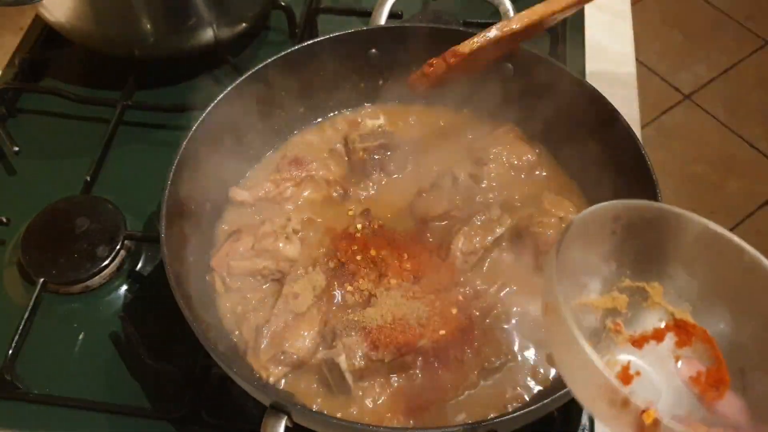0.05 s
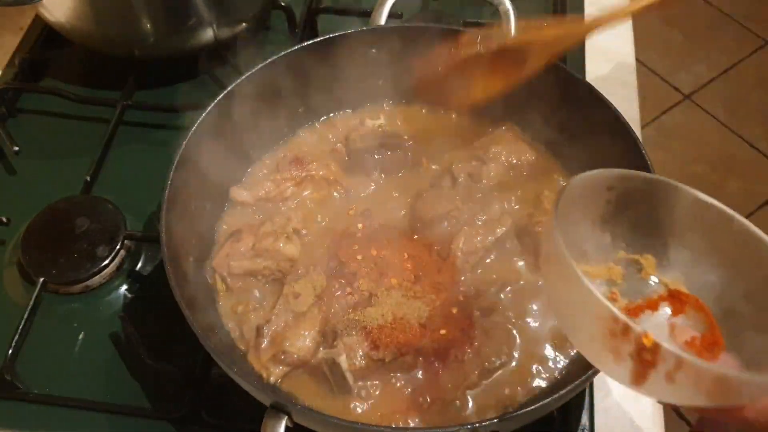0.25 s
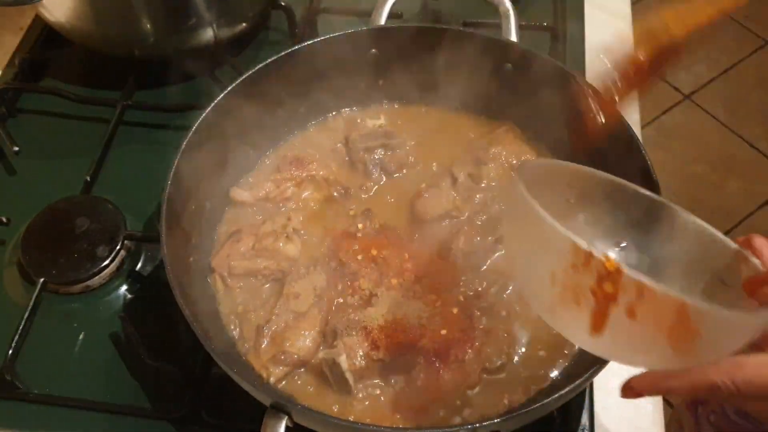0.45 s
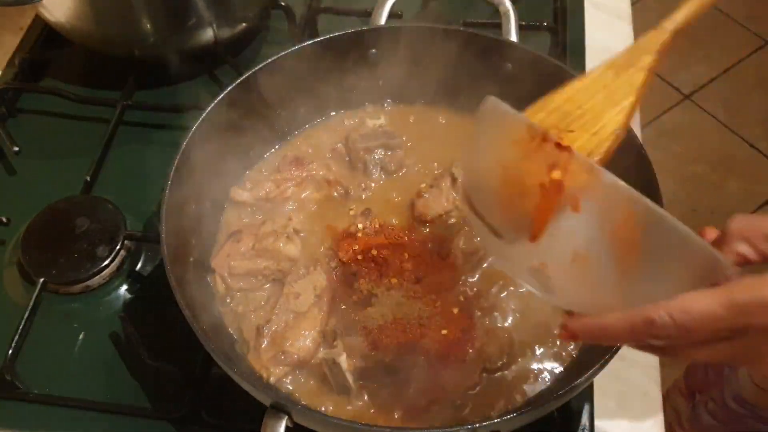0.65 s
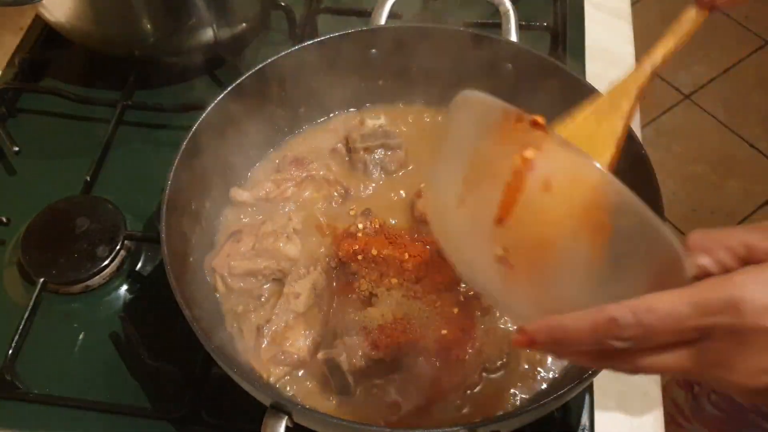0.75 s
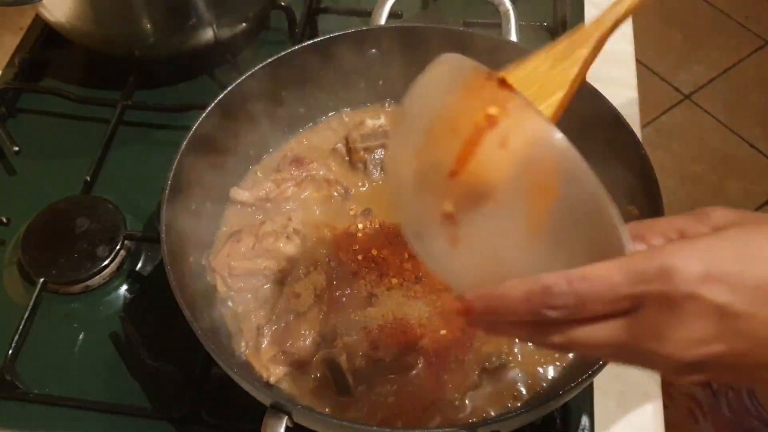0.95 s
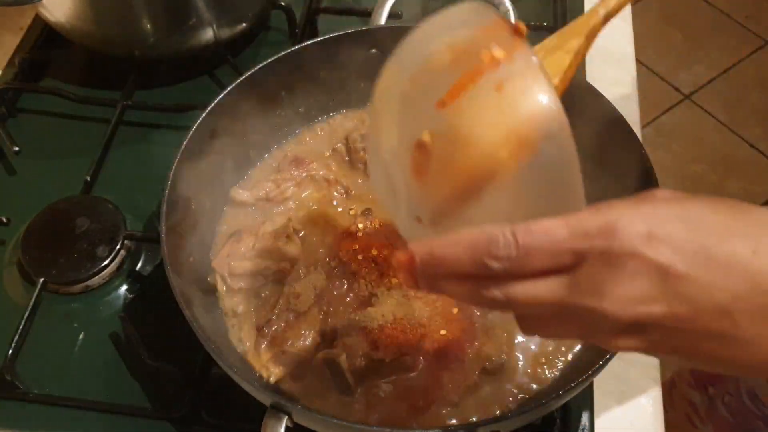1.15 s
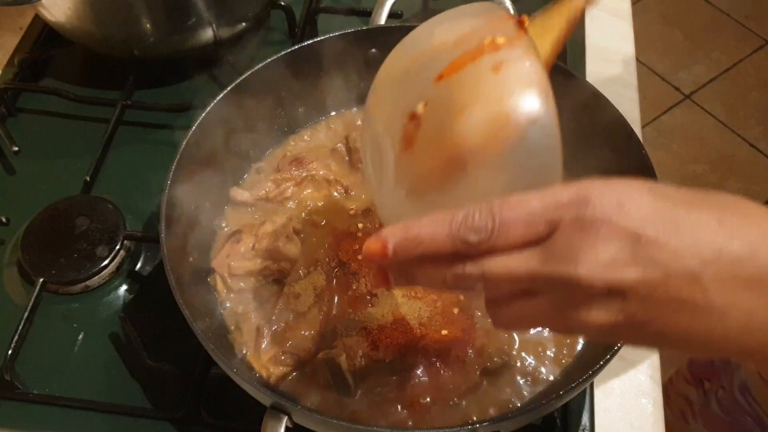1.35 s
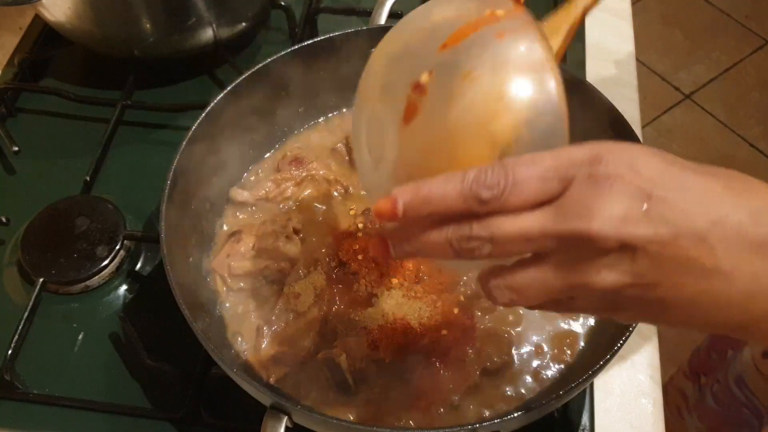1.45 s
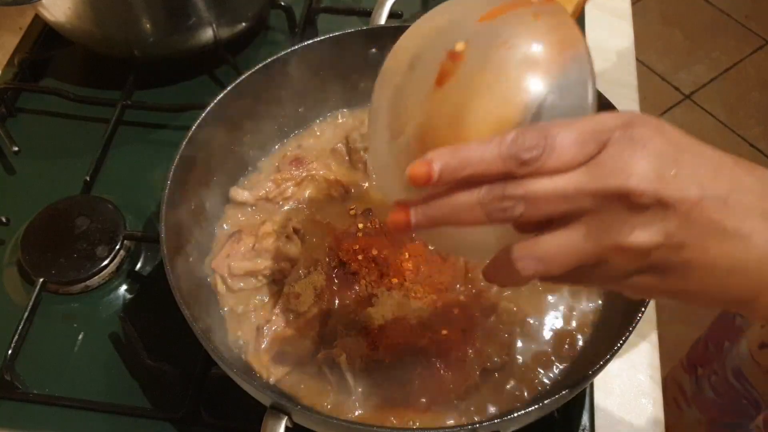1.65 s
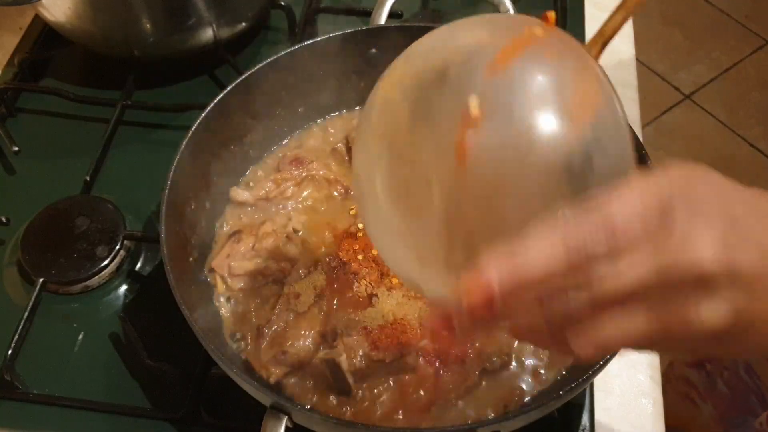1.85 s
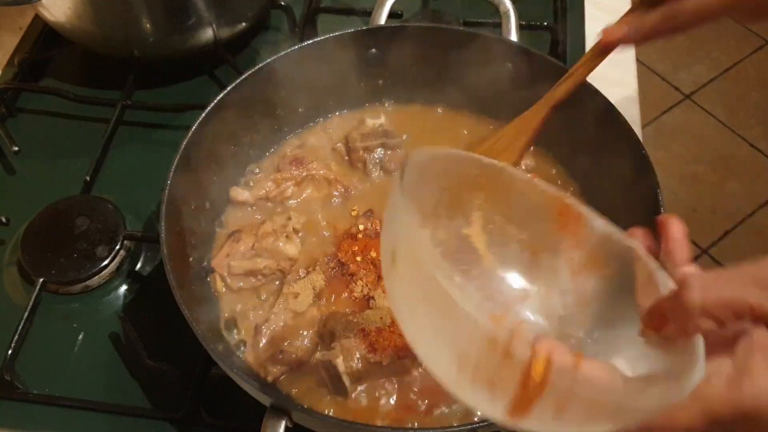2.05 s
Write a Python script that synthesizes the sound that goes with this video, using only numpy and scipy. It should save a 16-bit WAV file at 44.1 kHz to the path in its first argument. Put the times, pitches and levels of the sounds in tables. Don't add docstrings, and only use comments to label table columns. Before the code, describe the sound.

A wooden spoon strikes a steel wok rim once, loud and ringing with a low stove thump, then taps a plastic bowl irregularly over faint simmering; small tiled kitchen, close stereo microphones.

```python
import sys
import numpy as np
from scipy import signal
from scipy.fft import rfft, irfft, next_fast_len
from scipy.io import wavfile
from scipy.ndimage import uniform_filter1d, map_coordinates

SR = 44100
rng = np.random.default_rng(int(sys.argv[2]) if len(sys.argv) > 2 else 0)


def volts_from_db(level):
    exponent = np.asarray(level, float) / 20
    return 10 ** exponent


def output_pcm(signal):
    pcm = np.clip(np.atleast_2d(signal).T, -1, 1) * 32767
    wavfile.write(sys.argv[1], SR, np.round(pcm).astype(np.int16))


N = 92610
HALF = SR // 2
TAP_CYCLES = 0.95


def unit(x):
    return x / np.sqrt(np.mean(x ** 2) + 1e-20)


def along(points, hz):
    f, value = np.transpose(points)
    return np.interp(np.log(hz + 1), np.log(f + 1), value)


def wobble(rate):
    return map_coordinates(rng.standard_normal(64 + N // 200), [np.arange(N) * rate / SR])


def filtered(x, response):
    m = next_fast_len(x.shape[-1] + 8192)
    spectrum = rfft(x, m) * response(np.fft.rfftfreq(m, 1 / SR))
    return irfft(spectrum, m)[..., :x.shape[-1]]


def add(out, s, x):
    k = round(s * SR)
    part = out[..., k:k + x.shape[-1]]
    part += x[..., :part.shape[-1]]


def ring(hz, t60, attack, phase=0):
    t = np.arange(HALF) / SR
    return np.sin(2 * np.pi * hz * t + phase) * volts_from_db(-60 * t / t60) * (1 - np.exp(-t / attack))


def burst(hz, cycles):
    c = np.arange(SR // 16) / SR * hz
    return -np.sin(2 * np.pi * c) * c / cycles * np.exp(1 - c / cycles)


def dying(t60s):
    hz, t, z = signal.stft(rng.standard_normal((2, HALF)), SR, nperseg=256)
    decay = volts_from_db(-60 * t / along(t60s, hz)[:, None])
    return signal.istft(z * decay, SR, nperseg=256)[1][:, :HALF]


def rush(spectrum, patchy_db):
    z = signal.stft(rng.standard_normal((2, N)), nperseg=512)[2]
    field = uniform_filter1d(rng.standard_normal(z.shape[1:]), size=6, axis=0)
    field = uniform_filter1d(field, size=6, axis=1)
    pair = signal.istft(z * volts_from_db(patchy_db * unit(field)), nperseg=512)[1][:, :N]
    return unit(filtered(pair, lambda hz: volts_from_db(along(spectrum, hz))))


# f/Hz, correlation
LIKENESS = [(60, 0.96), (180, 0.92), (550, 0.76), (1650, 0.18), (4970, 0.042), (15000, 0.01)]


def paired(pair):
    def mid_side(hz):
        turn = np.arccos(np.clip(along(LIKENESS, hz), -1, 1)) / 2
        return np.array([np.cos(turn), np.sin(turn)])
    mid, side = filtered(pair, mid_side)
    return np.array([mid + side, mid - side])


# f/Hz, t60/s
KITCHEN_DECAY = [(200, 0.18), (1000, 0.17), (4000, 0.17), (12000, 0.067)]


def kitchen(x):
    wall_s = 0.0025
    tail = dying(KITCHEN_DECAY)
    delayed = np.pad(x, ((0, 0), (round(wall_s * SR), 0)))
    return signal.fftconvolve(delayed, tail / np.linalg.norm(tail[0]), axes=1)


# f/Hz, level/dB, t60/s
STEEL_MODES = [(541, -9, .16), (678, -10, .23), (880, -3.5, .29), (1699, 1, .18), (1970, -6, .12),
               (2290, -2, .2), (2925, -8, .17), (4126, -16, .15), (4396, -14, .16), (4872, -24, .25),
               (5992, -11, .26), (7084, -19, .15), (8053, -21, .15), (10430, -6, .15)]


def steel_ring():
    attack_s, late_hz = 0.015, 3000
    pan_db, phase_rad, waver_rad = 1.5, 0.7, 0.4
    steel = np.zeros((2, HALF))
    for hz, level_db, t60 in STEEL_MODES:
        gain = volts_from_db(level_db + pan_db * rng.standard_normal((2, 1)))
        phase = phase_rad * rng.standard_normal((2, 1)) + waver_rad * wobble(54)[:HALF]
        steel += gain * ring(hz, t60, attack_s * (1 + (hz / late_hz) ** 2), phase)
    return steel


# f/Hz, level/dB per Hz
CLANG_COLOUR = [(150, -39), (250, -6.5), (427, -8), (882, -10), (1430, -5.5), (1700, -3), (2490, -9),
                (6880, -10), (15500, -36.5)]
# f/Hz, t60/s
CLANG_DECAY = [(300, 0.51), (1500, 0.35), (5000, 0.26), (14000, 0.32)]


def clang_and_crack():
    clang_db, rattle_db = -14.5, 1.5
    crack_db, crack_t60_s = -12.5, 0.017
    t = np.arange(HALF) / SR

    def colour(hz):
        return volts_from_db(along(CLANG_COLOUR, hz))
    scale = np.sqrt(np.mean(colour(np.linspace(0, SR / 2, num=2000)) ** 2))
    rattle = volts_from_db(rattle_db * wobble(158.8)[:HALF])
    clang = paired(filtered(dying(CLANG_DECAY), colour)) * rattle
    crack = paired(filtered(rng.standard_normal((2, HALF)), colour)) * volts_from_db(-60 * t / crack_t60_s)
    return (volts_from_db(clang_db) * clang + volts_from_db(crack_db) * crack) / scale


# t/s after the blow, level/dB, f/Hz
RIM_CONTACTS = [
    (-.002, -30, 1100),
    (-.0003, -3, 2000),
    (.0012, 1, 2250),
    (.0012, -7, 750),
    (.004, -6, 1900),
    (.014, -9, 2100),
    (.018, -8, 1800),
]


def rim_chatter(out, s, db):
    for after, level_db, hz in RIM_CONTACTS:
        lag_s = 0.0001 * rng.standard_normal()
        contact = volts_from_db(db + level_db) * burst(hz, TAP_CYCLES)
        add(out[0], s + after - lag_s, contact)
        add(out[1], s + after + lag_s, contact)


# f/Hz, level/dB, t60/s, delay/s, swell/s
STOVE_MODES = [
    (60.3, -7, 0.29, 0.017, 0.041),
    (105, -4, 0.1, 0.012, 0.014),
    (105.5, -26, 0.3, .12, 0.014),
    (197.8, -15.5, 0.1, 0.0083, 0.0062),
    (188, -34.5, 0.14, .16, 0.01),
]
# f/Hz, level/dB per Hz
SHUDDER_COLOUR = [(25, -33), (45, -2), (110, -5), (220, -13), (320, -23), (500, -69)]


def stove_shake(out, s):
    shudder_db, t60_s, swell_s = -17.5, 0.47, 0.016
    t = np.arange(HALF) / SR
    envelope = volts_from_db(-60 * t / t60_s) * (1 - np.exp(-t / swell_s))
    shudder = paired(rush(SHUDDER_COLOUR, patchy_db=-1.0))[:, :HALF] * envelope
    add(out, s, volts_from_db(shudder_db) * shudder)
    for hz, level_db, t60, delay, swell in STOVE_MODES:
        add(out, s + delay, volts_from_db(level_db) * ring(hz, t60, swell))


# t/s, peak level/dB
BLOW = [
    (0.209, -5),
]


def knock():
    steel_db, room_db = -6, -5.5
    out = np.zeros((2, N))
    for s, db in BLOW:
        blow = volts_from_db(db) * clang_and_crack()
        add(out, s, blow + volts_from_db(db + steel_db) * steel_ring())
        rim_chatter(out, s, db)
        add(out, s, volts_from_db(room_db) * kitchen(blow))
        stove_shake(out, s)
    return out


# t/s, peak level/dB, upper f/Hz, lower f/Hz, lower tone level/dB
BOWL_TAPS = [(0.4365, -43, 1650, 900, 10.5), (0.6731, -23, 2540, 967, -4), (0.9265, -12, 2400, 960, -13),
             (1.0401, -20.5, 1366, 835, -5.5), (1.053, -40.5, 3000, 1020, 12),
             (1.1551, -28.5, 1940, 1075, 6), (1.212, -38.5, 1900, 910, -5), (1.31, -44.5, 1980, 1130, 6),
             (1.3963, -28, 2460, 950, -15), (1.4233, -40, 2030, 1025, 8), (1.43, -44, 2200, 1020, 10),
             (1.492, -39, 1270, 514, 0.5), (1.6711, -30, 1080, 493, -3), (1.855, -38.5, 1670, 683, -2),
             (2.006, -39, 2440, 920, -1), (2.0863, -35.5, 2000, 580, -3.5)]


def taps():
    pan_db, lead_s, room_db = -1, 0.00004, -5
    rim_hz, rim_db, rim_db_per_octave = 3000, -5, 12
    out = np.zeros((2, N))
    side = volts_from_db([[pan_db], [-pan_db]])
    for s, db, hz, low_hz, low_db in BOWL_TAPS:
        contact = burst(hz, TAP_CYCLES)
        rim = volts_from_db(rim_db + rim_db_per_octave * np.log2(hz / rim_hz)) * burst(rim_hz, cycles=4.5)
        hollow = volts_from_db(low_db) * burst(low_hz, cycles=0.7)
        tap = volts_from_db(db) * side * (contact + rim + hollow)
        add(out[0], s - lead_s, tap[0])
        add(out[1], s + lead_s, tap[1])
        add(out, s, volts_from_db(room_db) * kitchen(tap))
    return out


# f/Hz, level/dB per Hz
SCRAPE_COLOUR = [(200, -44), (450, 2), (1000, 3), (2500, 3), (3300, -8), (5000, -37)]


def scrape():
    peak_s, rise_s, level_db = 2.088, 0.021, -41.5
    swell = np.exp(-np.abs(np.arange(N) / SR - peak_s) / rise_s)
    roughness = volts_from_db(level_db + 3.2 * wobble(120))
    return roughness * swell * paired(rush(SCRAPE_COLOUR, patchy_db=-1.5))


# t/s, level/dB
HAND_THUDS = [
    (0.932, -36),
    (1.104, -41),
    (1.335, -37),
    (2.024, -33.5),
]


def thuds():
    out = np.zeros((2, N))
    for s, db in HAND_THUDS:
        hz = 113.4 * np.exp(0.16 * rng.standard_normal())
        add(out, s, volts_from_db(db) * ring(hz, t60=0.13, attack=0.023))
    return out


# t/s, peak level/dB, f/Hz
SAUCE_SPITS = [
    (0.4996, -33, 6170),
    (0.7657, -37.5, 5900),
    (1.3164, -41, 6240),
    (1.38, -40, 6060),
    (1.604, -37, 4800),
    (1.8108, -36, 4370),
    (1.9247, -32.5, 7160),
]


def spits():
    out = np.zeros((2, N))
    t = np.arange(400) / SR
    for s, db, hz in SAUCE_SPITS:
        spray = uniform_filter1d(np.diff(rng.standard_normal((2, 401))), size=2) * volts_from_db(-60 * t / 0.0067)
        pop = ring(hz, t60=0.0052, attack=0.000072)[:400]
        add(out, s, volts_from_db(db) * (0.94 * pop + 0.37 * spray))
    return out


def grains(count, hz, spread, cycles, rise, scatter_db):
    u = rng.random((count, 3))
    f = np.clip(hz * np.exp(spread * rng.standard_normal((count, 1))), 150, 7400)
    phase = f * np.arange(900) / SR
    c = phase / cycles
    size = volts_from_db(-scatter_db * np.log(u[:, 1:2]))
    envelope = c * np.exp(-3 * c) * (c < 3)
    wave = size * np.sin(2 * np.pi * cycles * c * (1 + rise * c)) * envelope
    at = (u[:, :1] * N).astype(int) + np.arange(900)
    turn = 2 * np.pi * u[:, 2:]
    pair = [np.bincount(at.ravel(), (wave * gain).ravel(), N + 900)[:N] for gain in (np.cos(turn), np.sin(turn))]
    return unit(np.array(pair))


# t/s, level/dB
SIMMER_STRENGTH = [(0.0, -50), (0.15, -51.5), (0.29, -49.5), (0.69, -50), (0.92, -49.5), (1.75, -50),
                   (2.1, -49)]
# f/Hz, level/dB per Hz
SAUCE_COLOUR = [(120, -31), (200, -9.5), (274, -11.5), (365, -9), (419, -5.5), (675, -5.5), (1340, -10.5),
                (1640, -11.5), (4000, -21), (5200, -31), (8800, -120)]
# f/Hz, level/dB per Hz
STEAM_COLOUR = [(880, -27), (1500, -27.5), (1860, 0), (2730, -7.5), (2980, -6), (6350, -2.5), (7360, -0.5),
                (8700, -12.5), (15700, -16.5)]
# f/Hz, level/dB per Hz
BURNER_COLOUR = [(15, -44), (25, -11), (43, -4), (123, -3.5), (143, -2.5), (162, -39), (204, -13.5),
                 (260, -43), (340, -27), (570, -120)]


def simmer():
    s, db = np.transpose(SIMMER_STRENGTH)
    strength_db = np.interp(np.arange(N) / SR, s, db) + 0.23 * wobble(10.5)
    burner = volts_from_db(-7 + 1.1 * wobble(14)) * rush(BURNER_COLOUR, patchy_db=0.4)
    sauce = volts_from_db(0.5 + 0.6 * wobble(24.97)) * rush(SAUCE_COLOUR, patchy_db=2.37)
    steam = volts_from_db(-2 + 1.2 * wobble(45)) * rush(STEAM_COLOUR, patchy_db=0.35)
    bubbles = volts_from_db(-8) * grains(count=260, hz=745.7, spread=0.542, cycles=7.6, rise=0.096, scatter_db=0.0)
    fizz = volts_from_db(-11) * grains(count=900, hz=4270, spread=0.306, cycles=8.5, rise=0.021, scatter_db=4.0)
    return paired(volts_from_db(strength_db) * (burner + sauce + steam + bubbles + fizz))


def scene():
    return knock() + taps() + scrape() + thuds() + spits() + simmer()


# f/Hz, left minus right level/dB
MICROPHONE_LEAN = [(60, -4.5), (150, 1), (380, -0.5), (950, -2.0), (2380, -0.5), (5980, -5.5), (15000, -7)]


def microphones(dry):
    low_cut_hz, top_hz = 48, 15740

    def response(hz):
        band = (hz < top_hz) * hz ** 3 / np.sqrt(hz ** 6 + low_cut_hz ** 6)
        return band * volts_from_db(along(MICROPHONE_LEAN, hz) * np.array([[0.5], [-0.5]]))
    return filtered(dry, response)


def roll_off(x):
    return signal.sosfilt(signal.butter(12, 15830, fs=SR, output="sos"), x)


def record(dry):
    mix = microphones(dry)
    return roll_off(mix)


dry = scene()
out = record(dry)
output_pcm(out)
```